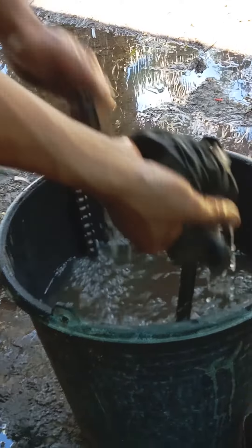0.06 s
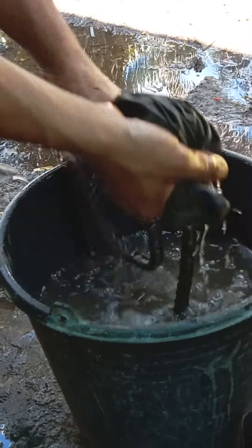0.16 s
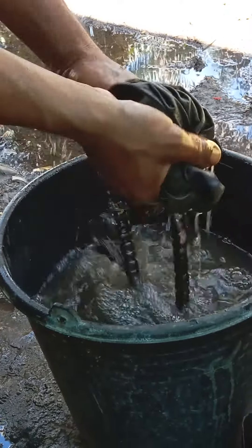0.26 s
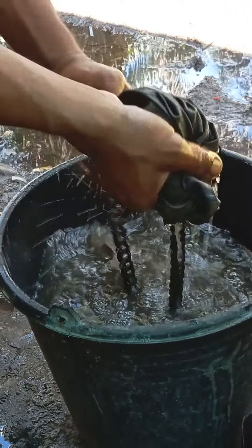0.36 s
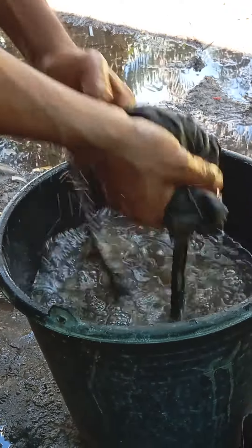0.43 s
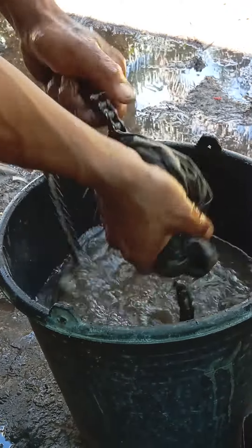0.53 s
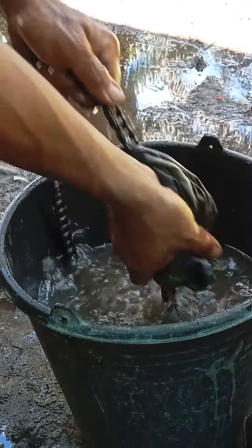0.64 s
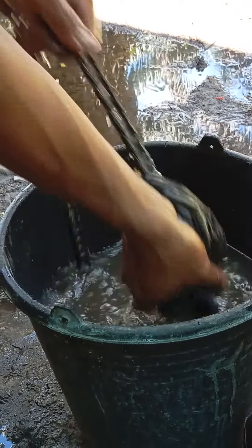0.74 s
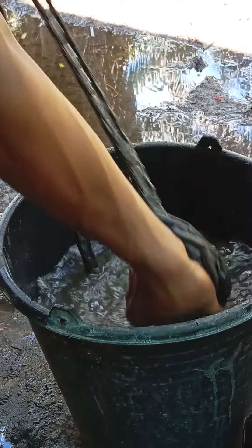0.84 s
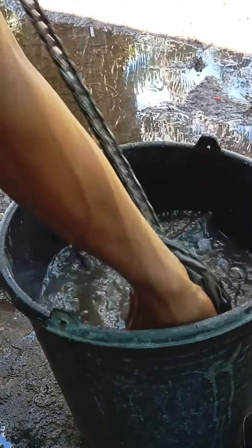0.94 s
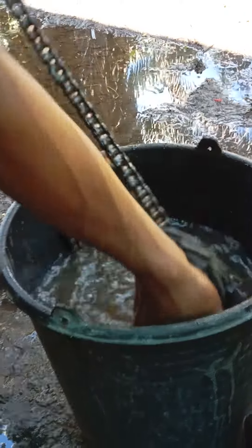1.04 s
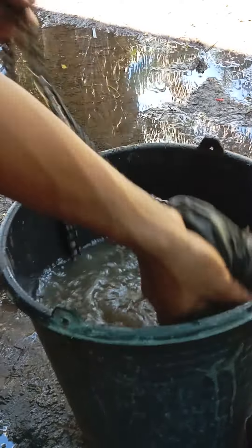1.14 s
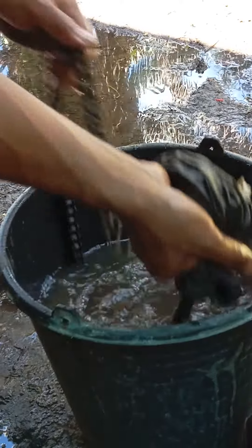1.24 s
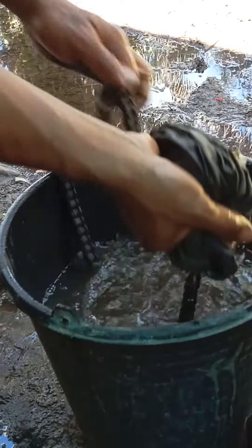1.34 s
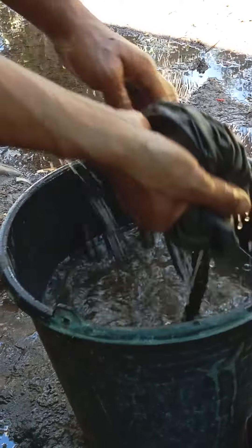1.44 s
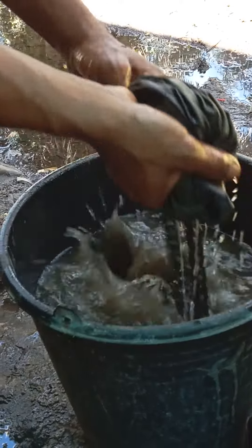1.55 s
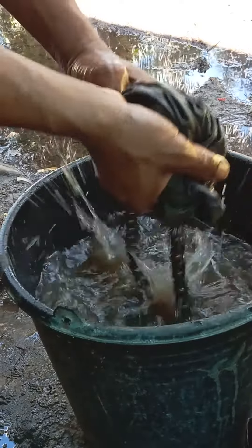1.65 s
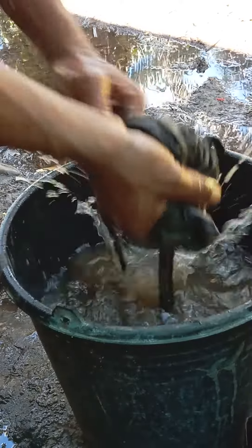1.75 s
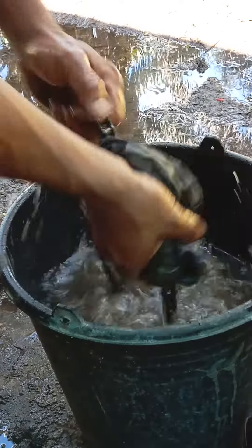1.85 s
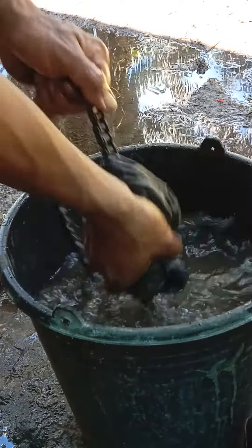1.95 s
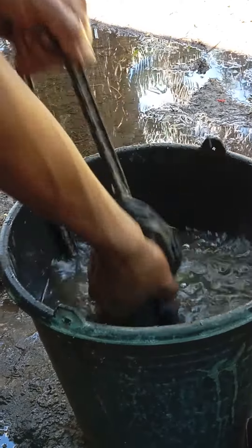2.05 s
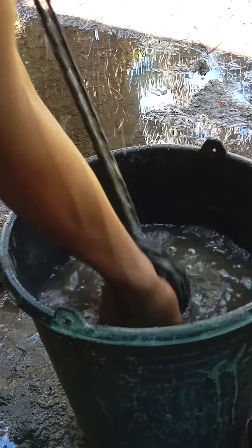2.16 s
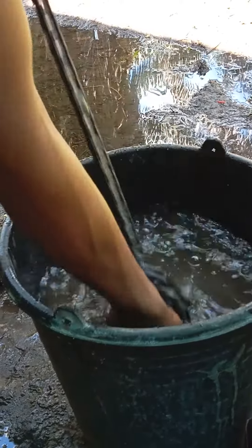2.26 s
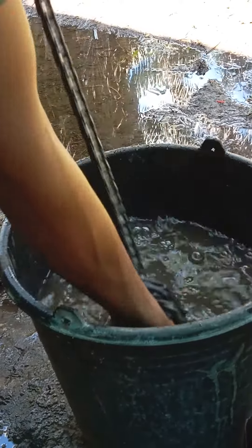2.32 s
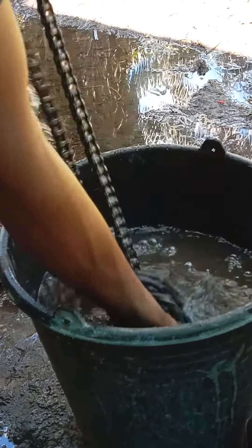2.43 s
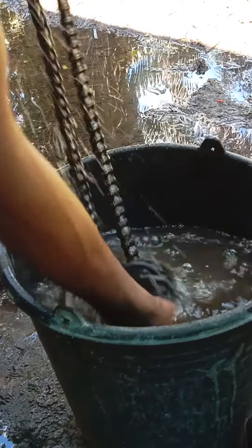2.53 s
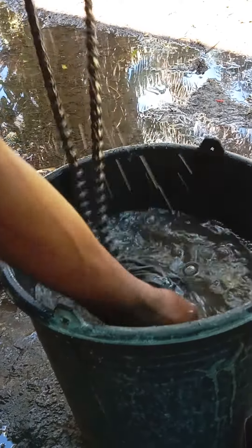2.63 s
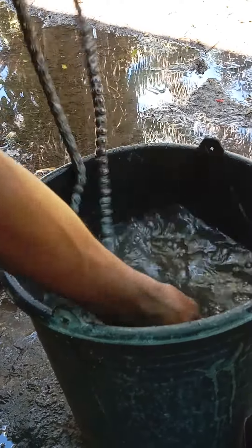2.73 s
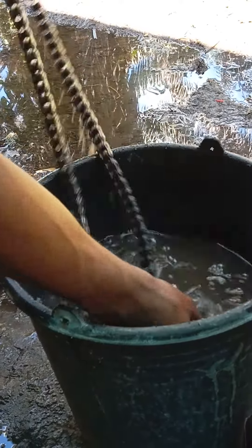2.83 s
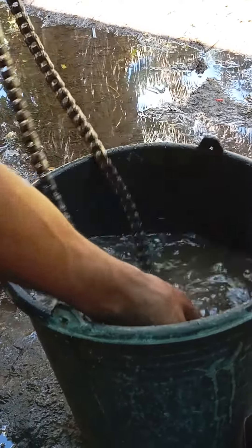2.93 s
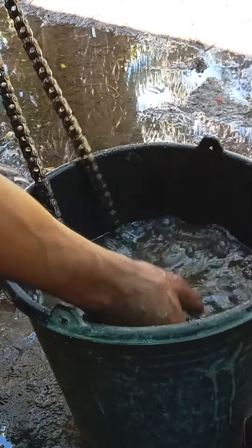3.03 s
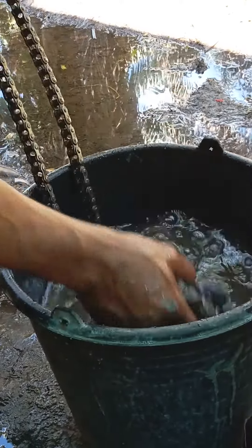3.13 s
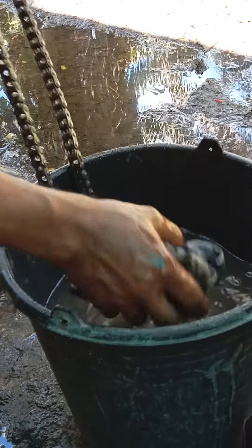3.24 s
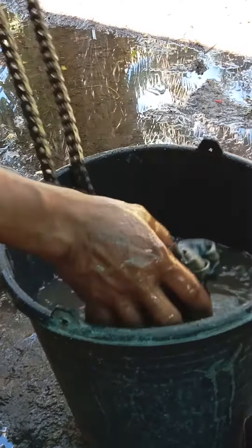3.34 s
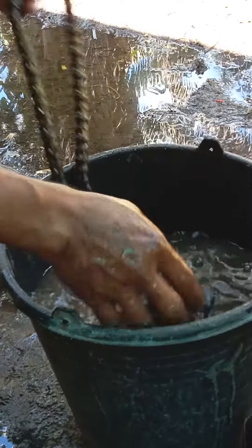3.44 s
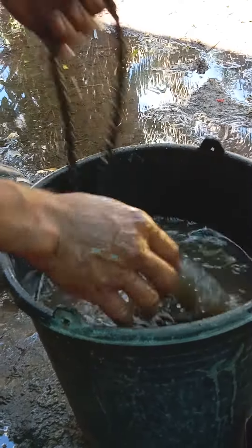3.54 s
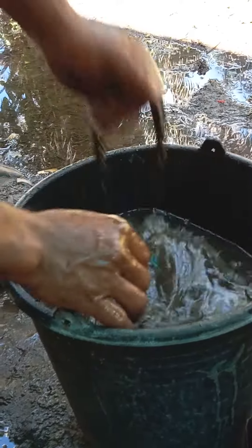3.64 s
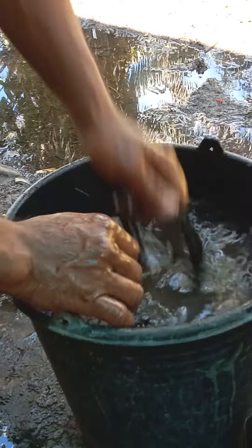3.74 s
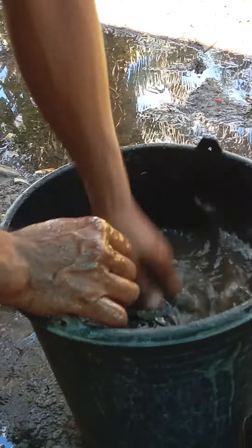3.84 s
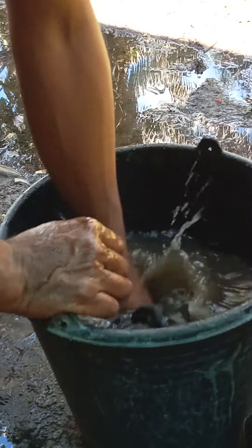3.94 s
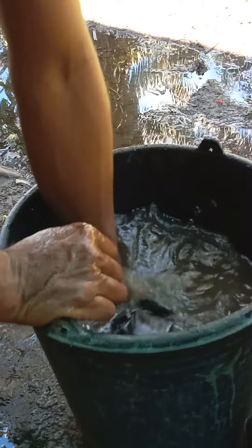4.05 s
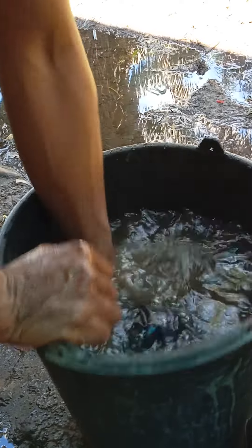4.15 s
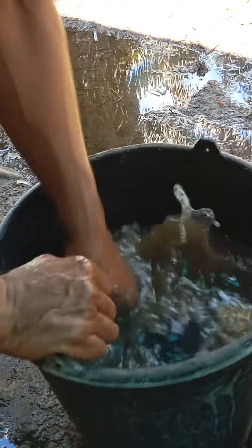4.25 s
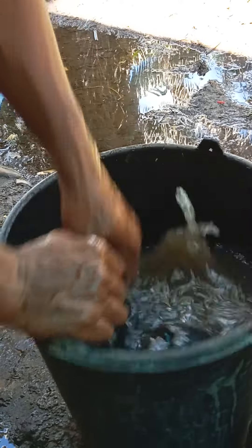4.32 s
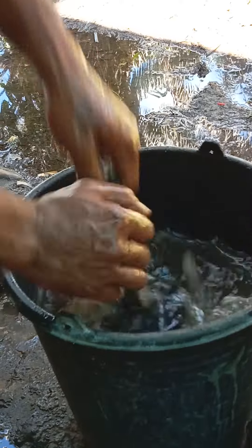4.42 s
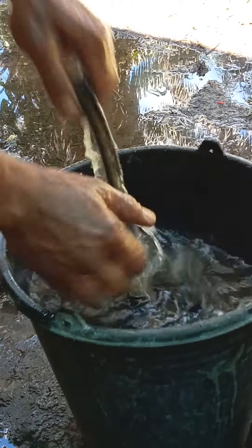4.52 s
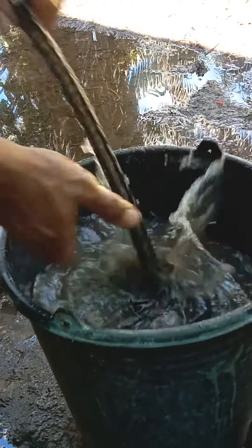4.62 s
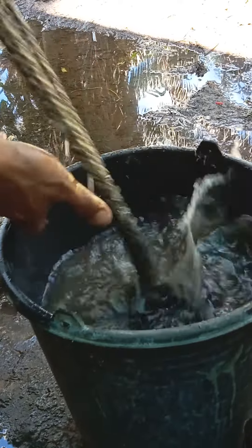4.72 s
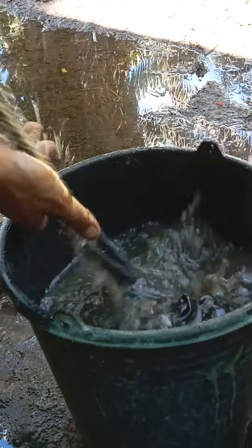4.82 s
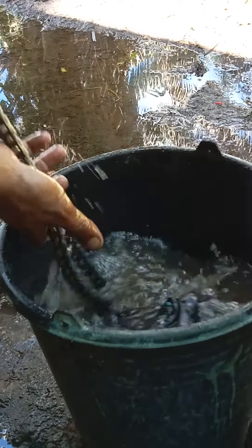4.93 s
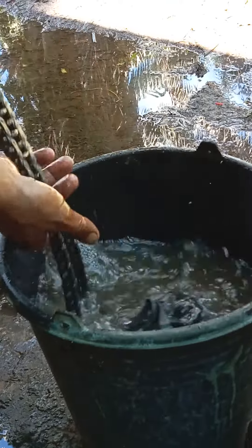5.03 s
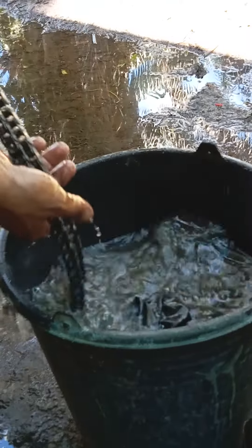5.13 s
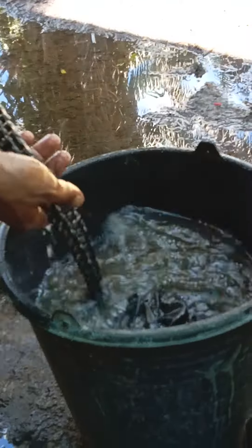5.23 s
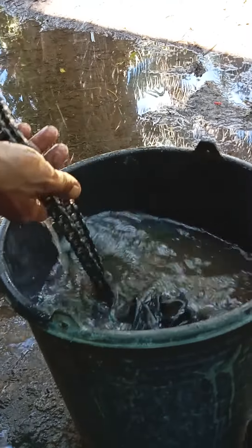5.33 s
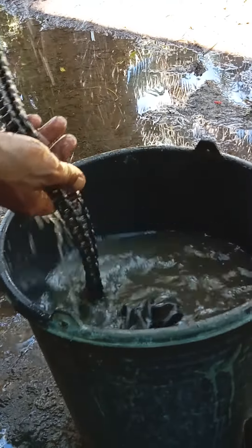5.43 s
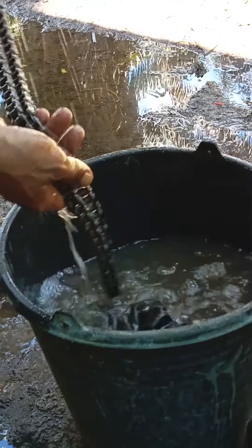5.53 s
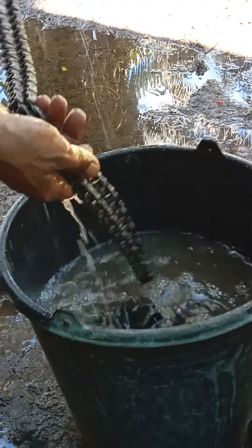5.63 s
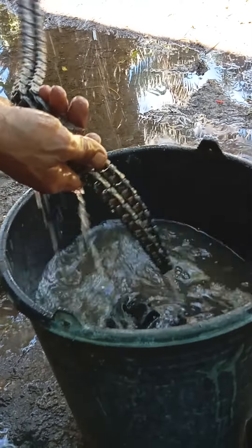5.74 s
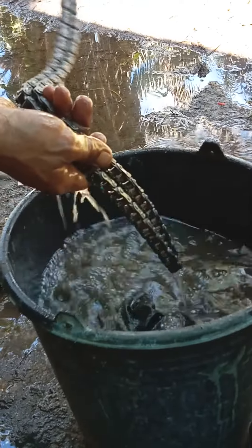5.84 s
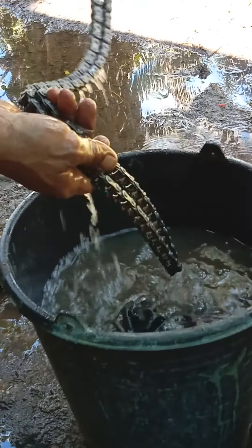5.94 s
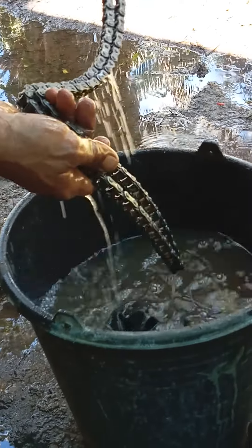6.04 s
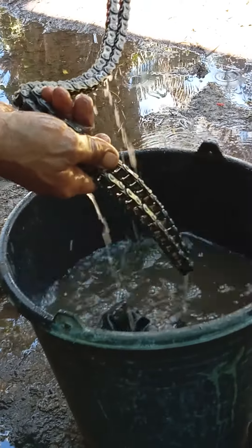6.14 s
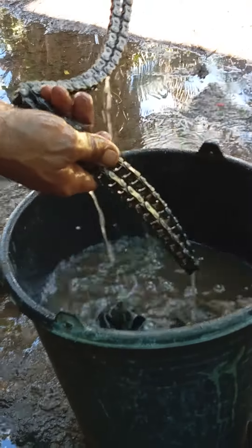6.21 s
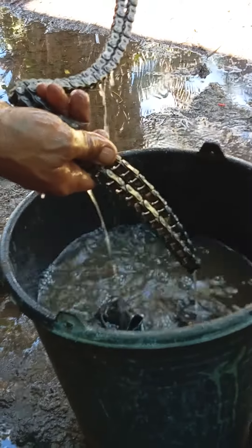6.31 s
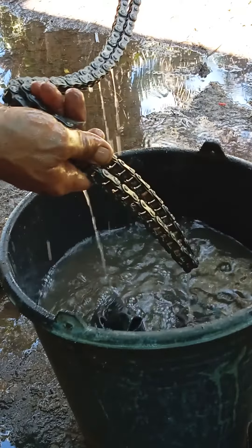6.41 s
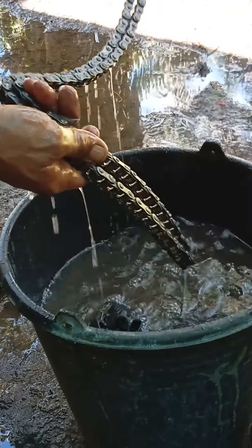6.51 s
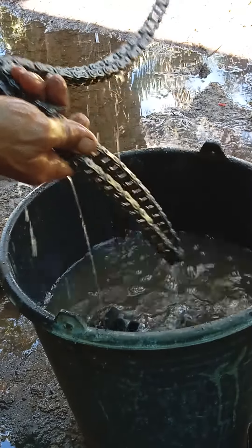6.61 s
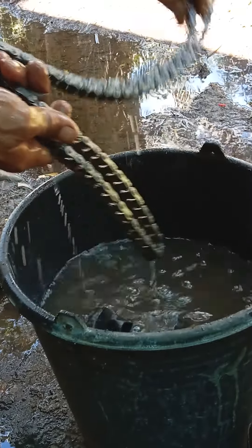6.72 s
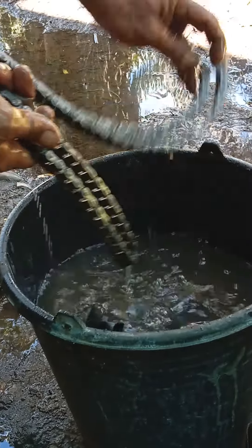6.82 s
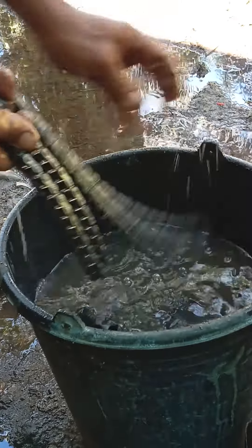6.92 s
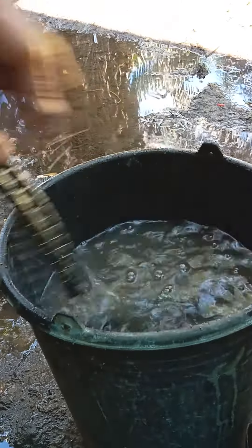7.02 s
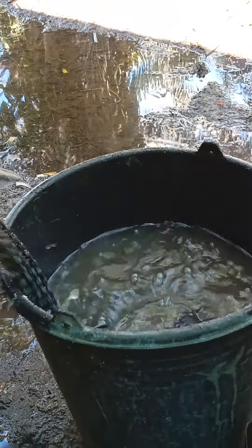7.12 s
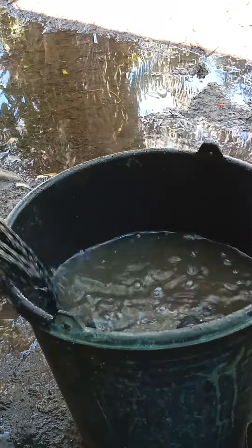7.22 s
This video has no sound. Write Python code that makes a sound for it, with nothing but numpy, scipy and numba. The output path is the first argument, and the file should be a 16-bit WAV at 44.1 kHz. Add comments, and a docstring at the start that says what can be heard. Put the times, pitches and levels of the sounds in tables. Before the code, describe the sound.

A phone held near a water-filled bucket in a quiet yard catches a chain being rinsed. Rapid dull knocks on the hollow plastic mix with wet slaps, fizzing spray and gurgling bubbles, surging with each hand stroke. Two hard knocks stand out in a quieter middle, gentler swishing follows, then thin dripping over near silence. It ends with a brief splash and several clacks, above a low distant drone.

```python
"""Outdoors in a yard, a phone close to a plastic bucket: a metal chain is dunked and rinsed in water by hand.
Knocks are damped noise with a hollow tone; splashes are bursts of tiny decaying sines, bubbles single ones.
Swarms of such grains over soft noise make the churning, gurgling and trickling.
The chain is then held up to drip and swung out over the rim; distant machinery drones in the quiet air."""
import sys
import numpy as np
from scipy import signal
from scipy.fft import rfft, irfft
from scipy.io import wavfile
from numba import njit

SR = 44100
rng = np.random.default_rng(int(sys.argv[2]) if len(sys.argv) > 2 else 0)


def materialize(psi):
    """Save the field psi as 16-bit PCM at rate SR to the path in sys.argv[1].

    A 1-D psi becomes a single channel; in a 2-D psi each row is a channel.
    """
    bounded = np.clip(np.atleast_2d(psi).T, -1, 1)
    quanta = np.round(bounded * 32767).astype(np.int16)
    wavfile.write(sys.argv[1], SR, quanta)


N = 320607
TIME = np.arange(N) / SR  # [s]

# Outdoor air, colour of its noise: f/Hz, relative level/dB
AIR_COLOUR = [(15, -70), (25, -2), (54, 9.5), (93, -1.5), (150, -1.5), (207, -8), (404, -22), (543, -15.5),
              (655, -20), (1540, -24), (2780, -20.5), (4620, -22), (6540, -33.5), (9020, -29), (15000, -30)]
AIR_DB = -57.5  # rms before the microphone
# Distant machinery, bands of drone: centre f/Hz, width/Hz, level/dB
DRONE_BANDS = [(79.5, 9.8, -57.5), (101.8, 15.4, -59), (153, 9, -70.5), (198.9, 20, -64), (291, 42, -65),
               (423, 59, -67)]

# Hand strokes that dunk, swish or shake the chain:
# from t/s, to t/s, slosh level/dB, bubbling level/dB, spray level/dB (before colouring and trims)
HAND_STROKES = [(0.0, 0.04, -26, -38, -55), (0.078, 0.22, -31, -41, -57), (0.307, 0.403, -34, -29, -50),
                (0.42, 0.57, -39, -46, -63), (0.688, 0.658, -21.5, -32, -43),
                (1.047, 1.085, -40, -43.5, -70), (1.249, 1.437, -47, -46.5, -59),
                (1.578, 1.682, -28.5, -26, -42), (1.81, 1.947, -45.5, -65, -81),
                (2.112, 2.242, -39, -37.5, -56.5), (2.305, 2.465, -45.5, -53, -61),
                (3.038, 3.222, -43.5, -57.5, -70), (3.421, 3.56, -41, -49.5, -61.5),
                (3.565, 3.716, -40.5, -47.5, -65), (3.727, 3.855, -35, -36, -52.5),
                (3.841, 3.962, -39.5, -36, -47.5), (4.005, 4.053, -28, -29, -46.5),
                (4.243, 4.335, -39, -69, -77), (4.365, 4.472, -34.5, -35.5, -55),
                (4.516, 4.582, -42.5, -31.5, -53), (4.614, 4.79, -48.5, -38.5, -53.5),
                (4.8, 5.07, -77, -46, -53), (5.26, 5.31, -61, -60, -48.5), (5.566, 5.66, -55, -66, -51),
                (7.112, 7.118, -23.5, -28.5, -44)]
# Afterwash of a stroke: slosh, bubbling, spray level/dB re the stroke
AFTERWASH_LEVELS = [-24, -16.5, -18]
# Water left to itself: slosh, bubbling, spray level/dB
SETTLED_LEVELS = [-62, -68, -77]
# 1/e times of the amplitude, as the water swells, falls back and washes on
ATTACK_S, RELEASE_S, AFTERWASH_S = 0.0079, 0.019, 0.58
HEAVE_RATE_HZ, HEAVE_DB = 30.15, 1  # the stirred water heaves unevenly
CALM_DB = -49  # below this slosh level the links hardly move and little air is dragged under
# Colours of the churning, of its bubbles and of fine droplets: f/Hz, relative level/dB
SLOSH_COLOUR = [(100, 1.5), (200, -5.5), (300, -6.5), (430, -3), (800, -3), (1300, 0.5), (2000, -11.5)]
BUBBLING_COLOUR = [(1400, -1.5), (1800, -4), (2700, 0.5), (3600, -4), (4600, 1), (6000, -5), (7000, -5.5)]
SPRAY_COLOUR = [(5000, -33), (7200, -8.5), (9400, 7.5), (11500, 1.5), (14000, 6), (16000, 7.5)]

# Chain and hand knocking on the bucket: t/s, clack level/dB, thump/dB re clack, crack/dB re clack,
# hollow f/Hz, hollow/dB re clack (thump and crack before their trims)
CHAIN_KNOCKS = [(0.001, -17.5, -14, -11.5, 884, 14), (0.054, -20, -8, -14, 940, 11),
                (0.112, -16.5, -3.5, -3, 840, 14), (0.126, -10, -11, -9, 850, 9),
                (0.154, -17, -16, -11, 1310, 12), (0.16, -10.5, -25, -21, 874, -2),
                (0.263, -30.5, -3.5, 6, 670, 17), (0.331, -18, -24, -1.5, 1345, 0.5),
                (0.375, -24.5, -14, 1, 470, 8), (0.436, -23, -5, -3, 1190, 6),
                (0.448, -16.5, -7.5, -10, 690, -6), (0.487, -14, -7.5, -6.5, 1200, 0),
                (0.606, -29, -14, -15, 1460, -2), (0.666, -27, -15, -7, 696, -9),
                (0.679, -16, -11, -4, 856, 4), (0.847, -31.5, -14, -22, 687, -1.5),
                (0.927, -34, -9.5, -13, 680, 3), (1.0333, -18.5, -17, -16.5, 890, 8),
                (1.049, -26, -14, -11, 930, 1), (1.096, -29.5, -9, -26, 630, 5),
                (1.161, -27, -9.5, -19, 945, 8), (1.217, -23.5, -21, -19.5, 893, 7.5),
                (1.277, -23.5, -14, -30, 890, 1), (1.312, -23.5, -11, -23, 950, 16),
                (1.334, -25, -6, -11.5, 890, 19), (1.428, -34.5, -9, -32, 835, 22),
                (1.558, -13, -14, -9.5, 1220, -3), (1.575, -10.5, -9.5, -8, 1280, 4),
                (1.59, -15, -1.5, -14, 780, 22), (1.626, -25, -11, 1, 560, 15),
                (1.648, -19, -12, -0.5, 694, 0), (1.679, -11, -7, -6, 676, -4.5),
                (1.694, -8.5, -9.5, -19, 710, -24), (1.743, -27, -6, -20, 680, 3),
                (1.779, -25.5, -6, -14, 1230, 3), (1.801, -25, -4, -14.5, 805, -1),
                (2.115, -30.5, -23, -11, 1160, -9), (2.154, -17, -27, -22, 747, 2),
                (2.163, -17, -18, -15, 754, -4), (2.213, -19, -35, -19, 720, 1),
                (2.225, -16, -21, -13.5, 546, 0.5), (2.2415, -17.5, -13, -8, 740, 2),
                (2.334, -30.5, -20, -34, 850, 7), (2.413, -27.5, -13, -21, 1030, -4),
                (2.727, -10.5, -13.5, -14.5, 834, -3.5), (2.818, -10.5, -13, -9.5, 802, -1),
                (2.981, -35.5, -1, -39, 805, -5), (3.041, -23.5, -12.5, -29, 834, 0.5),
                (3.133, -26.5, -23, -25, 490, -6), (3.179, -29, -29, -23, 553, -2),
                (3.35, -34, 0, -11, 544, -16), (3.44, -26, -4.5, -7, 800, 18),
                (3.745, -19, -32, -26, 487, -12), (3.811, -16.5, -11, -13, 1136, 15),
                (3.827, -30.5, 3.5, -22, 670, 9), (4.002, -25, -1, -21, 525, 9),
                (4.313, -30, -6, -26, 620, 2), (4.421, -23, -29, -34, 1160, 2),
                (4.738, -23.5, -29, -20, 605, -8), (7.104, -19, -11, -7, 1110, 1),
                (7.125, -12, -7, -7.5, 866, 4), (7.204, -17, -10.5, -11.5, 924, 2)]
# Colour of a blow: f/Hz, relative level/dB
BLOW_COLOUR = [(100, -6.5), (250, -10.5), (500, 5), (850, -2), (1300, 4.5), (1800, -1.5), (3300, -14),
               (4200, -22.5), (8000, -24.5), (16000, -7)]
REBOUND_S, REBOUND_DB = 0.014, -11  # mean delay and level of the one bounce after each knock
# Loose links tap the wall at random, following the slosh level
TAP_RE_SLOSH_DB, TAP_SPREAD_DB = 4, 12
TAP_THUMP_DB, TAP_CRACK_DB, TAP_HOLLOW_DB = -7.5, -9, 14.5
TAP_LOW_HZ, TAP_HIGH_HZ = 524, 1078
# Water cushions a blow: the less it cracks, the slower it builds up
CUSHION_AT_DB, CUSHION_DB_PER_DOUBLING = -14, 7
# Bucket wall and the air in it, resonances: f/Hz, level/dB (before the ring trim), t60/s
BUCKET_MODES = [(105.5, -24, 0.14), (192, 8.5, 0.19), (307, 5, 0.11), (367, 1, 0.1), (464, -23, 0.18),
                (652, 2.5, 0.053), (690.6, 0.5, 0.11), (796, 5.5, 0.15), (888, -15.5, 0.24),
                (926, -10, 0.14), (1000, -49, 0.074), (1167, -0.5, 0.033), (1487, -0.5, 0.014),
                (2120, -8, 0.067), (2790, -16.5, 0.037), (3020, -38, .05)]

# Water slapping and bursting into droplets: t/s, slap level/dB, spray level/dB (before trims), decay/s
WATER_SPLASHES = [(0.1133, -18.5, -36, 0.0015), (0.1248, -17, -30, 0.0033), (0.1527, -29, -29, 0.0039),
                  (0.1617, -13, -21.5, 0.0018), (0.2856, -27, -23, 0.0024), (0.2985, -16.5, -30, 0.0058),
                  (0.3114, -25.5, -19, 0.011), (0.3193, -21, -17, 0.0059), (0.3764, -25.5, -38, 0.0045),
                  (0.3853, -27, -14, 0.0033), (0.3964, -18.5, -38, 0.0034), (0.4328, -26.5, -31, 0.007),
                  (0.6799, -24.5, -48, 0.0044), (1.515, -44.5, -32.5, 0.024), (1.5484, -38, -35.5, 0.0098),
                  (1.558, -40, -23, 0.0076), (1.5843, -20, -18.5, 0.0082), (1.6164, -24, -38, 0.0057),
                  (1.6307, -22, -38, 0.005), (1.673, -14.5, -30, 0.017), (1.6804, -26, -15.5, 0.0042),
                  (2.037, -34, -30, 0.0037), (2.2404, -28, -50, 0.007), (2.4304, -28, -28, 0.013),
                  (3.1362, -37.5, -37.5, 0.006), (3.444, -47, -27, 0.0045), (3.4943, -26.5, -41, 0.045),
                  (3.5541, -33.5, -37, 0.012), (3.6555, -31, -42, 0.018), (3.7354, -25.5, -28.5, 0.0034),
                  (3.861, -24, -27, 0.0035), (3.9325, -17.5, -25, 0.0084), (4.0034, -27, -33, 0.005),
                  (4.0497, -24, -25, 0.0038), (4.1034, -32.5, -37, 0.0026), (4.4066, -29.5, -29, 0.0028),
                  (4.4288, -47, -30.5, 0.014), (4.4649, -37, -40, 0.0062), (4.5396, -50, -28, 0.005),
                  (4.5564, -48.5, -28, 0.029), (4.7336, -44, -24.5, 0.0022), (4.829, -35, -41, 0.0045),
                  (4.9282, -31, -25.5, 0.0034), (4.962, -38, -44, 0.004), (5.1426, -49, -39, 0.0025),
                  (5.24, -40, -33.5, 0.0044), (5.269, -37.5, -30, 0.006), (5.2864, -54, -37, 0.005),
                  (5.2984, -43, -24.5, 0.005), (5.3052, -63, -28.5, 0.008), (5.5618, -53, -33.5, 0.026),
                  (5.6134, -29.5, -27.5, 0.0022), (5.645, -45.5, -31, 0.016), (5.906, -48, -41.5, 0.004),
                  (6.14, -46, -39, 0.005), (6.1903, -38, -47, 0.0041), (6.2714, -40, -45, 0.0053),
                  (6.3205, -36.5, -47, 0.003), (6.3699, -63, -42, 0.0031), (6.7161, -52, -38, 0.002),
                  (7.041, -54, -37, 0.0077), (7.0518, -35.5, -31, 0.028), (7.1032, -22.5, -28, 0.018)]
# Stray droplets flicked off at random, following the bubbling and spray levels
FLICK_RE_BUBBLING_DB, FLICK_RE_SPRAY_DB = -3.5, 13.5
FLICK_SPREAD_DB, FLICK_DECAY_S = -10, 0.0023

# Single air pockets ringing: t/s, starting f/Hz, level/dB (before the trim),
# decay/cycles to 1/e, pitch change/octaves per 1/e time
AIR_POCKETS = [(0.689, 2990, -13.5, 9, -0.022), (0.843, 3040, -33.5, 10, 0.038),
               (1.38, 4520, -18.5, 5.2, 0.082), (1.395, 1560, -34.5, 6.6, 0.059),
               (1.456, 2150, -29.5, 9, .02), (1.625, 2700, -13, 31, -.02), (1.673, 2717, -10, 18, -0.065),
               (1.693, 656, -7, 1.5, -0.17), (1.848, 1890, -29, 13, 0.012), (1.876, 3220, -29.5, 13, 0.072),
               (2.242, 700, -16, 2.4, 0.094), (2.257, 292, -38, 9.5, -.4), (2.429, 1680, -26, 6, 0.021),
               (2.549, 2420, -37.5, 13, .02), (3.445, 2980, -19.5, 8.3, 0.071),
               (3.447, 4240, -16, 6.2, 0.019), (3.497, 5300, -33, 14, -0.073),
               (3.867, 3570, -15.5, 13, -0.23), (4.018, 1785, -15, 5.5, 0.085),
               (4.211, 2800, -35, 8.9, .03), (4.345, 718, -25.5, 6, 0.071), (4.352, 2830, -16, 10.6, -.08),
               (4.385, 1700, -22, 9.7, 0.015), (4.456, 158, -14.5, 1.4, -0.0022),
               (4.531, 1510, -10.5, 1.6, -0.069), (4.534, 732, -22.5, 8.4, -0.13),
               (4.827, 2460, -24.5, 14.4, 0.23), (4.929, 2050, -30, 9.6, -0.0027),
               (4.961, 667, -25.5, 6, -0.042), (5.001, 1310, -24, 6.5, .11), (5.24, 4200, -24, 6.9, 0.35),
               (5.269, 4300, -18, 3.9, -0.03), (5.276, 4730, -17.5, 4.3, -0.11),
               (5.306, 5000, -14.5, 5.9, -0.11), (5.602, 1054, -36.5, 6, 0.51),
               (5.603, 1946, -28.5, 13, .02), (5.63, 1440, -30, 1.5, .03), (5.638, 916, -38, 8.9, 0.32),
               (6.276, 1910, -35.5, 3.4, -0.13), (6.285, 2750, -36, 12, 0.047), (6.32, 2920, -26, 6.5, .2),
               (6.493, 2930, -27, 12.4, -0.0068), (6.656, 1370, -45.5, 20, 0.65),
               (6.765, 2470, -32.5, 11, -0.052), (6.782, 1990, -35.5, 15, .03)]
# Thin streams running off the lifted chain: from t/s, to t/s, level/dB
CHAIN_TRICKLES = [(0.76, 0.870, -63), (1.384, 1.45, -63), (1.876, 2.01, -50.5), (2.505, 2.728, -57.5),
                  (5.035, 5.152, -53), (5.330, 5.397, -57), (5.519, 5.72, -51), (5.75, 5.97, -58.5),
                  (6.122, 6.205, -65), (6.252, 6.333, -53), (6.343, 6.478, -59)]
TOP_HZ = 15850  # upper limit of the microphone


def amp(db):
    """Amplitude factor of a level in dB."""
    return 10 ** (np.asarray(db) / 20)


def unit(x):
    """Scale to rms 1."""
    return x / np.sqrt(np.mean(x ** 2) + 1e-20)


def peak(x, db):
    """Scale to a peak level."""
    return x * amp(db) / (np.abs(x).max() + 1e-12)


def band(x, lo_hz, hi_hz, order=2):
    """Causal band-pass."""
    edges_hz = [lo_hz, min(hi_hz, .48 * SR)]
    return signal.sosfilt(signal.butter(order, edges_hz, "band", fs=SR, output="sos"), x)


def colour(x, points, size=2048):
    """Causal minimum-phase filter that follows (f/Hz, level/dB) points."""
    hz, db = np.transpose(points)
    bins_hz = np.maximum(np.arange(size // 2 + 1) * SR / size, 1)
    curve_db = np.interp(np.log(bins_hz), np.log(hz), db)
    # folding the cepstrum onto positive time makes the filter causal
    cepstrum = irfft(np.log(amp(curve_db)))
    cepstrum[1:size // 2] *= 2
    cepstrum[size // 2 + 1:] = 0
    impulse = irfft(np.exp(rfft(cepstrum)))
    return signal.fftconvolve(x, impulse)[:len(x)]


def add(out, s, x):
    """Mix x into out from time s on."""
    i = max(int(s * SR), 0)
    out[i:i + len(x)] += x[:max(len(out) - i, 0)]


@njit
def ring(n, s, hz, size, cycles, glide, onset):
    """Damped sines that build up over onset cycles; their pitch may glide as air pockets move."""
    out = np.zeros(n)
    for k in range(len(s)):
        start = max(int(s[k] * SR), 0)
        life = cycles[k] * SR / hz[k]  # 1/e time in samples
        phase, step, a = 0., 2 * np.pi * hz[k] / SR, size[k]
        fade, rise = np.exp(-1 / life), 2 ** (glide[k] / life)
        for i in range(start, min(n, start + int(6 * life))):
            phase += step
            out[i] += a * np.sin(phase) * min(phase / (2 * np.pi * onset[k]), 1.)
            a *= fade
            step = min(step * rise, 2.8)  # stay below half the sample rate
    return out


def swarm(level_db, lo_hz, hi_hz, cycles, glide, spread_db, busy_db, wash_db, count,
          sparsest=.08, onset_share=0.12):
    """Many small bubbles or droplets over a soft noise wash; the higher the level, the more of them."""
    when, pitch, size, life, lot = rng.random((count, 5)).T
    share = np.clip(amp((level_db - busy_db) * .6), sparsest, 1)[(when * N).astype(int)]
    on = lot < share
    hz = lo_hz * (hi_hz / lo_hz) ** pitch[on]
    lives = cycles * (.5 + life[on])
    # fewer grains are each made stronger, so that the level holds
    strength = amp(spread_db * np.minimum(-np.log(1 - size), 4)) / np.sqrt(share)
    grains = ring(N, when[on] * N / SR, hz, strength[on], lives, glide * 2 * life[on], onset_share * lives)
    wash = unit(band(rng.standard_normal(N), lo_hz, hi_hz))
    return (unit(grains) + amp(wash_db) * wash) * amp(level_db)


def surroundings():
    """Quiet outdoor air as coloured noise, with narrow noise bands as the drone of distant machinery."""
    air = unit(band(colour(rng.standard_normal(N), AIR_COLOUR), 62, 13000, order=5))
    sound = amp(AIR_DB) * air
    for hz, width, db in DRONE_BANDS:
        sound += amp(db) * unit(band(rng.standard_normal(N), hz - width / 2, hz + width / 2))
    return sound


def stirring():
    """Levels in dB of slosh, bubbling and spray as each stroke swells, holds and leaves an afterwash."""
    power = np.zeros((3, N)) + amp(SETTLED_LEVELS)[:, None] ** 2
    afterwash = amp(AFTERWASH_LEVELS)[:, None] ** 2
    for start, end, *db in HAND_STROKES:
        before, after = np.maximum(start - TIME, 0), np.maximum(TIME - end, 0)
        swell = np.exp(-2 * before / ATTACK_S)
        fall = np.exp(-2 * after / RELEASE_S) + afterwash * np.exp(-2 * after / AFTERWASH_S)
        power += amp(db)[:, None] ** 2 * swell * fall
    heave = np.interp(TIME * HEAVE_RATE_HZ, np.arange(N), rng.standard_normal(N))
    return 10 * np.log10(power) + HEAVE_DB * heave


def churn(slosh_db, bubbling_db, spray_db, spurt_hz=110, spurt_db=5.5, bubbling_trim_db=-5):
    """Stirred water: low sloshing, fizz, distinct plinks and fine spray, all surging at each stroke."""
    # water breaks in quick spurts, which throw bubbles and spray together
    spurts = spurt_db * np.interp(TIME * spurt_hz, np.arange(N), rng.standard_normal(N))
    slosh = swarm(slosh_db, lo_hz=222.6, hi_hz=1463, cycles=6.3, glide=0.028, spread_db=2,
                  busy_db=-44.5, wash_db=-7.5, count=3500)
    fizz = swarm(bubbling_db + spurts, lo_hz=1446, hi_hz=6970, cycles=5.0, glide=0.059, spread_db=-2.5,
                 busy_db=-39.5, wash_db=-12.0, count=22000, sparsest=.15)
    plinks = swarm(bubbling_db, lo_hz=1900, hi_hz=5840, cycles=21.0, glide=0.0233, spread_db=2.5,
                   busy_db=-47.5, wash_db=-49, count=1500)
    spray = swarm(spray_db + spurts, lo_hz=5700, hi_hz=16200, cycles=1.0, glide=.01, spread_db=2.5,
                  busy_db=-50.0, wash_db=-14.0, count=20000, sparsest=.15)
    bubbling = colour(amp(bubbling_trim_db) * (fizz + plinks), BUBBLING_COLOUR)
    return colour(slosh, SLOSH_COLOUR) + bubbling + colour(spray, SPRAY_COLOUR)


def gurgle(slosh_db, bubbling_db, trim_db=-8, slosh_share=0.46):
    """Larger pockets of air dragged under by the strokes plop back up, each rising in pitch."""
    mixed_db = slosh_share * slosh_db + (1 - slosh_share) * bubbling_db
    level_db = mixed_db + trim_db + np.minimum(slosh_db - CALM_DB, 0)
    return swarm(level_db, lo_hz=651, hi_hz=2533, cycles=7.8, glide=0.0464, spread_db=4,
                 busy_db=-42, wash_db=-37, count=650)


def blows(slosh_db, count=70):
    """The knocks, a weaker rebound after each, and taps of loose links as strong as the slosh allows."""
    rebounds = []
    for (s, db, *tone), late in zip(CHAIN_KNOCKS, rng.random(len(CHAIN_KNOCKS))):
        rebounds.append((s + REBOUND_S * (.5 + late), db + REBOUND_DB, *tone))
    taps = []
    for k, (when, size, pitch) in enumerate(rng.random((count, 3))):
        i = int((k + when) / count * N)
        calm_db = min(slosh_db[i] - CALM_DB, 0)
        db = slosh_db[i] + TAP_RE_SLOSH_DB + TAP_SPREAD_DB * (2 * size - 1) + calm_db
        pitch_hz = TAP_LOW_HZ + pitch * (TAP_HIGH_HZ - TAP_LOW_HZ)
        taps.append((i / SR, db, TAP_THUMP_DB, TAP_CRACK_DB, pitch_hz, TAP_HOLLOW_DB))
    return [*CHAIN_KNOCKS, *rebounds, *taps]


def knocks(rows, rise_s=0.00042, contact_s=0.004, tail_db=-18, tail_s=0.0083, cycles=2.85,
           thump_trim_db=3, crack_trim_db=7):
    """Each blow on the water-damped wall is a short dead clack with a hollow pitch of its own."""
    out, t = np.zeros(N), np.arange(SR // 8) / SR
    fade = np.exp(-t / contact_s) + amp(tail_db) * np.exp(-t / tail_s)
    noises = rng.standard_normal((len(rows), len(t)))
    for (s, level_db, thump_db, crack_db, pitch_hz, hollow_db), noise in zip(rows, noises):
        cushion = 2 ** (max(CUSHION_AT_DB - crack_db, 0) / CUSHION_DB_PER_DOUBLING)
        clack = colour(noise * (1 - np.exp(-t / (rise_s * cushion))) * fade, BLOW_COLOUR)
        hollow_swell = 1 - np.exp(-pitch_hz * t / cushion)
        hollow = np.sin(2 * np.pi * pitch_hz * t) * hollow_swell * np.exp(-pitch_hz * t / cycles)
        body = peak(band(clack, 498, 1290), 0) + peak(hollow, hollow_db)
        # heavy blows thump the whole wall; hard contacts above the water crack
        thump = peak(band(clack, 198, 344), thump_db + thump_trim_db)
        crack = peak(band(clack, 2240, 4700), crack_db + crack_trim_db)
        blow = thump - peak(body, 0) + crack
        add(out, s, blow * amp(level_db))
    return out


def bucket(x, ring_trim_db=-5):
    """Every sound in the water also stirs the bucket's own resonances, each a decaying cosine."""
    t = np.arange(SR // 2) / SR
    hz, db, t60 = np.transpose(BUCKET_MODES)[:, :, None]
    decay = np.log(1000) / t60
    modes = amp(db) * 2 * decay / SR * np.cos(2 * np.pi * hz * t) * np.exp(-decay * t)
    return x + amp(ring_trim_db) * signal.fftconvolve(x, modes.sum(0))[:N]


def yard(x, wet_db=-14, t60_s=0.17, treble_db=-3, gap_s=0.00343):
    """The inside of the bucket, the ground and near walls return a short echo of decaying noise."""
    t = np.arange(SR // 2) / SR
    noise = rng.standard_normal(len(t)) * (t > gap_s)
    fade = np.exp(-np.log(1000) * t / t60_s)
    echo = (band(noise, 113, 1350) - amp(treble_db) * band(noise, 2360, 15500)) * fade
    echo /= np.sqrt(np.sum(echo ** 2))
    return x + amp(wet_db) * signal.fftconvolve(x, echo)[:N]


def bursts(bubbling_db, spray_db, count=55):
    """The splashes, and small flicks of water that follow the stirring."""
    flicks = []
    for k, (when, size) in enumerate(rng.random((count, 2))):
        i = int((k + when) / count * N)
        db = FLICK_SPREAD_DB * (2 * size - 1)
        slap_db = bubbling_db[i] + FLICK_RE_BUBBLING_DB + db
        flicks.append((i / SR, slap_db, spray_db[i] + FLICK_RE_SPRAY_DB + db, FLICK_DECAY_S))
    return [*WATER_SPLASHES, *flicks]


def splashes(rows, count=180, rise_s=0.00055, spread_db=-0.5, cycles=1.7, tail_db=-15, tail_s=.016,
             slap_trim_db=6, spray_trim_db=7, kin_share=0.24, kin_spread=0.2):
    """A slap of water tears into a burst of tiny ringing droplets, with stragglers falling after it."""
    out, n = np.zeros(N), SR // 8
    draws = rng.random((len(rows), 4, count))
    for (s, slap_db, spray_db, decay_s), (when, pitch, size, lot) in zip(rows, draws):
        delay = 4 * tail_s * when ** 2
        fall = np.exp(-delay / decay_s) + amp(tail_db) * np.exp(-delay / tail_s)
        swell = (1 - np.exp(-delay / rise_s)) * fall
        strength = amp(-spread_db * np.log(1 - size) / 2) * swell
        # droplets torn from one sheet of water are alike in size, which colours each splash
        pitch = np.where(lot < kin_share, np.abs(pitch[0] + kin_spread * (pitch - .5)), pitch)
        hz = 1700 + 13500 * pitch ** 1.5
        burst = ring(n, delay, hz, strength, np.full(count, cycles), np.zeros(count), np.ones(count))
        slap = peak(band(burst, 2410, 6100, order=3), slap_db + slap_trim_db)
        spray = peak(colour(band(burst, 4400, SR / 2), SPRAY_COLOUR), spray_db + spray_trim_db)
        add(out, s, slap + spray)
    return out


def bubbles(trim_db=2, onset_share=0.22):
    """The larger air pockets plink and gulp one by one, each a damped sine gliding in pitch."""
    s, hz, db, cycles, glide = np.array(AIR_POCKETS, float).T.copy()
    return ring(N, s, hz, amp(db + trim_db), cycles, glide, onset_share * cycles)


def trickle(edge_s=0.011):
    """Strings of small drops patter on the surface, each trapping a tiny bubble; a faint patter stays."""
    flow = amp(-68)
    for start, end, db in CHAIN_TRICKLES:
        gate = np.interp(TIME, [start - edge_s, start, end, end + edge_s], [0, 1, 1, 0])
        flow = flow + amp(db) * gate
    return swarm(20 * np.log10(flow), lo_hz=2704, hi_hz=6980, cycles=6.7, glide=0.019, spread_db=5.5,
                 busy_db=-52.5, wash_db=-15, count=1500)


def scene():
    """All the sounds of the bucket in the yard, over the surroundings."""
    slosh_db, bubbling_db, spray_db = stirring()
    water = churn(slosh_db, bubbling_db, spray_db) + gurgle(slosh_db, bubbling_db)
    water += knocks(blows(slosh_db))
    water += splashes(bursts(bubbling_db, spray_db))
    water += bubbles() + trickle()
    return (amp(-2.38) * yard(bucket(water)) + surroundings())[None]


def record(dry, low_cut_hz=58):
    """The phone's microphone drops the deep bass, rounds the loudest peaks and cuts the top."""
    heard = signal.sosfilt(signal.butter(8, low_cut_hz, "high", fs=SR, output="sos"), dry)
    rounded = np.tanh(heard)
    return signal.sosfilt(signal.ellip(10, .2, 70, TOP_HZ, fs=SR, output="sos"), rounded)


dry = scene()
out = record(dry)
materialize(out)
```